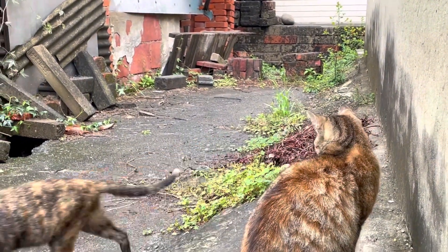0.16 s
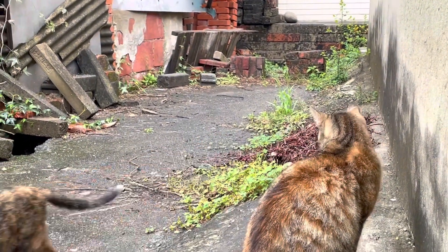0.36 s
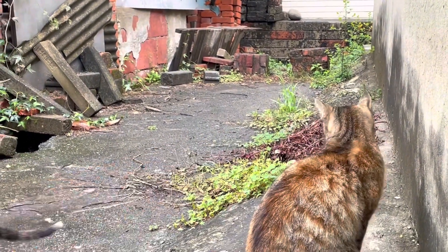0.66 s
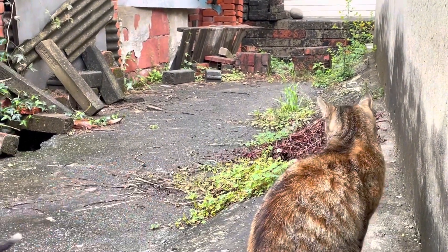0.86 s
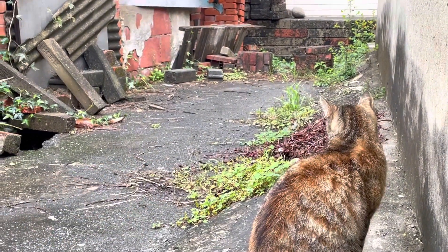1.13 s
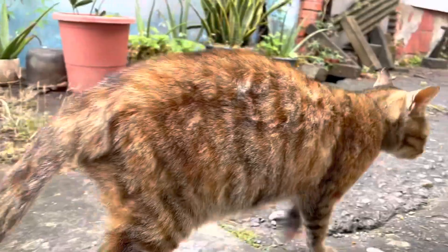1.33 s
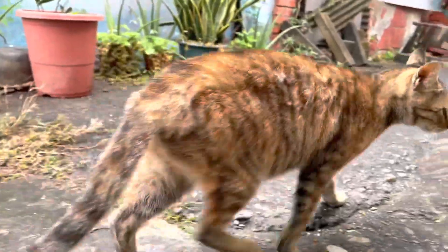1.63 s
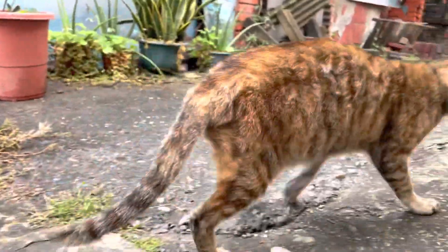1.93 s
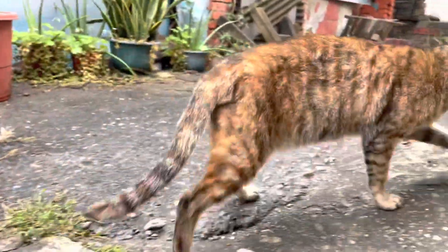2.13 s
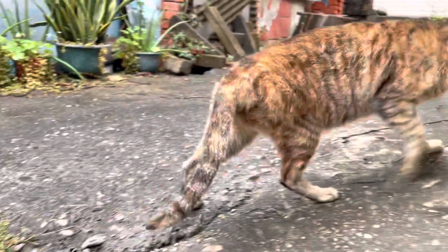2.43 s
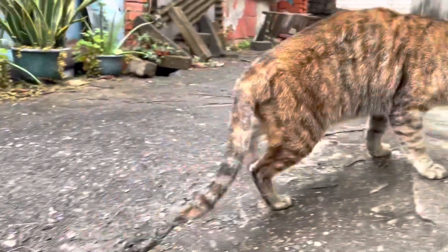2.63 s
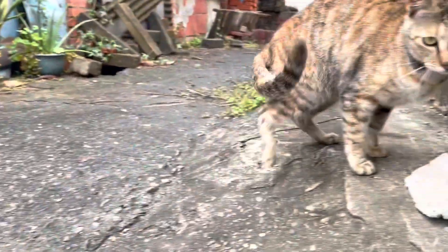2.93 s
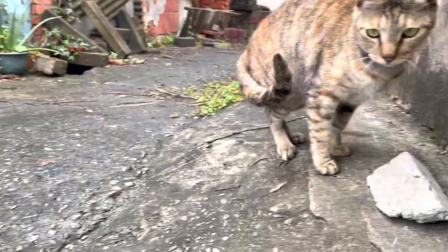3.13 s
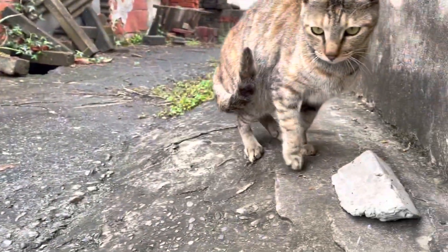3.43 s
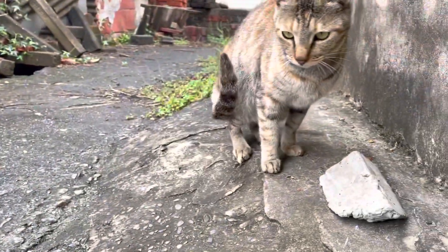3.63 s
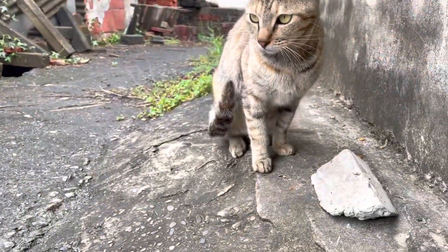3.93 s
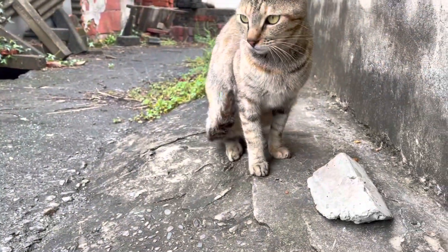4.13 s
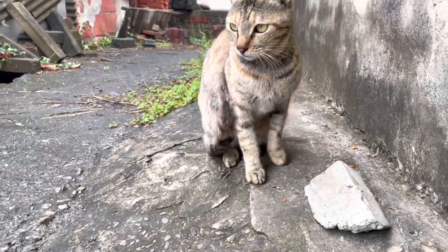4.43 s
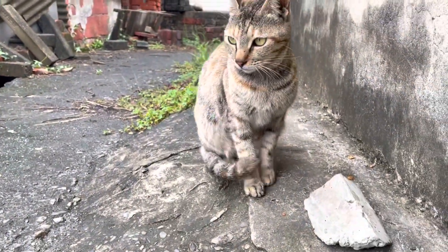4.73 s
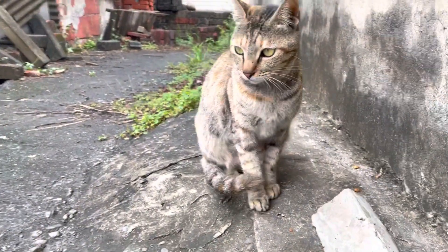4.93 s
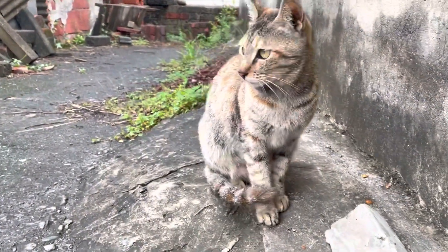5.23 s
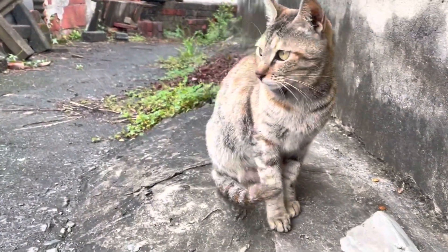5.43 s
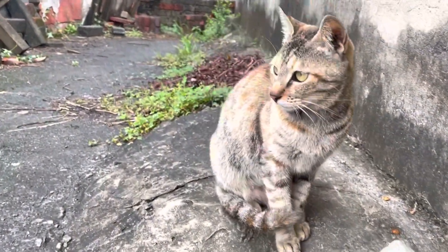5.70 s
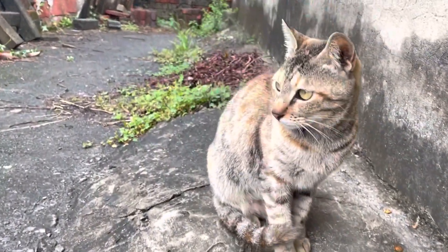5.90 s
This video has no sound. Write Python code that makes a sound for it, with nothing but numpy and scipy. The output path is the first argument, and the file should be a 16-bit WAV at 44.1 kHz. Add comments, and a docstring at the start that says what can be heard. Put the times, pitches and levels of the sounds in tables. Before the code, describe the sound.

Low distant traffic rumble in an alley with faint close scuffs and taps, two split-second dropouts, then an engine approaching with a rising whine.

```python
"""A back alley: far traffic roars over wavering hums, with two faint falling whistles early on.
Light scuffs on gritty concrete and small taps, made of short noise bursts, sound close by from the start.
At 1.2 s and again at 3.3 s all goes silent for a moment; after the first silence the traffic is brighter and wider.
After the second a vehicle draws near beyond the wall: engine tones, a rising whine and noise for the tyre roar."""
import sys
import numpy as np
from scipy import signal
from scipy.fft import rfft, irfft, next_fast_len
from scipy.io import wavfile
from scipy.ndimage import uniform_filter1d

SR = 44100
rng = np.random.default_rng(int(sys.argv[2]) if len(sys.argv) > 2 else 0)


def log_audio(samples):
    """Write samples as a 16-bit WAV file to the path given in sys.argv[1]."""
    # one column per channel
    frames = np.atleast_2d(samples).T
    # limit to full scale, then quantise
    limited = np.clip(frames, -1, 1)
    pcm = np.round(limited * 32767).astype(np.int16)
    wavfile.write(sys.argv[1], SR, pcm)


N = 267246  # length in samples, about 6.06 s

# short silences: start_s, end_s, wave height where the sound stops, wave height where it resumes
SILENCES = [(1.19324, 1.24110, .005, .017), (3.34410, 3.36658, .028, .030)]
# how often the engine fires, before a slight wander: time_s, rate_hz
FIRING_RATE = [(3.4, 45.62), (4.3, 45.78), (4.58, 47.54), (5.301, 48.06), (5.45, 48.43), (5.7, 48.3),
               (5.76, 47.92), (5.94, 48.1), (6.06, 47.6)]


def gain_of(db):
    """Turns decibels into a factor for the wave height."""
    return 10 ** (np.asarray(db) / 20)


def evened(x):
    """Scales a sound to an rms (average strength) of 1."""
    return x / np.sqrt(np.mean(x ** 2) + 1e-20)


def read(points, hz):
    """Looks up a table by frequency, with straight lines on a log-frequency axis."""
    f, value = np.transpose(points)
    return np.interp(np.log(hz + 1), np.log(f + 1), value)


def wander(per_s, count):
    """Slow random curves of rms 1: sums of 16 slow sines, the fastest at per_s cycles a second."""
    coarse_t = np.arange(0, N + 64, 64) / SR
    t = np.arange(N) / SR
    hz = np.geomspace(per_s / 20, per_s, 16)[:, None]
    curves = []
    for phase in rng.random((count, 16)):
        sines = np.sin(2 * np.pi * (hz * coarse_t + phase[:, None])) / hz ** 0.16
        curves.append(np.interp(t, coarse_t, evened(sines.sum(0))))
    return np.array(curves)


def resonate(x, hz, width):
    """A resonance, fixed or gliding: shifts hz down to zero, smooths twice, and shifts back."""
    turn = np.exp(2j * np.pi * np.cumsum(hz * np.ones(len(x))) / SR)
    r = np.exp(-np.pi * width / SR)
    smooth = signal.lfilter([(1 - r) ** 2], [1, -2 * r, r * r], x / turn)
    return 2 * (turn * smooth).real


def wash(spectrum, side_spectrum, side_db, patchy_db, flicker_db, drone_db=0):
    """Stereo noise shaped by mid and side spectra, with drifting patches and flicker in the treble."""
    # how far the side copies the mid, which tips the balance: pitch_hz, likeness (-1 to 1)
    lean = [(60, 0.34), (200, -0.57), (380, 0.096), (700, 0.35), (1300, .1), (4400, .3), (9000, 0.26)]
    # the same a quarter cycle apart, which tips the arrival: pitch_hz, likeness (-1 to 1)
    lead = [(200, 0), (380, .3), (600, .1), (1300, .3), (2200, 0.28), (3000, .4), (5000, .2), (5900, -.3),
            (9000, 0)]
    frames, hz = N // 512 + 5, np.fft.rfftfreq(2048, 1 / SR)
    a, b, c, d, patches = rng.standard_normal((frames, 1025, 5)).T
    patches = evened(uniform_filter1d(uniform_filter1d(patches, 16, 0), 8, 1))
    patches = patches * (hz / (hz + 250))[:, None]  # weaker in the bass
    flicker = evened(uniform_filter1d(rng.standard_normal(frames), 2)) * (hz / (hz + 2000))[:, None]
    drone_band = np.exp(-np.log((hz + 1) / 207) ** 2 / 4.1)[:, None]  # broad, centred near 207 Hz

    like = (read(lean, hz) + 1j * read(lead, hz))[:, None]
    mid = a + 1j * b
    side = like * mid + np.sqrt(np.clip(1 - abs(like) ** 2, 0, 1)) * (c + 1j * d)

    colour_db = np.array([read(spectrum, hz), read(side_spectrum, hz) + side_db])[:, :, None]
    level_db = colour_db + patchy_db * patches + flicker_db * flicker + drone_band * drone_db
    z = np.array([mid, side]) * gain_of(level_db)
    mid, side = signal.istft(z, nperseg=2048, noverlap=1536)[1][:, :N]
    return np.array([mid + side, mid - side]) / np.sqrt(np.mean(mid ** 2))


def traffic():
    """Far roar as shaped noise; from the end of the first silence it is brighter and wider."""
    # shape of the middle (mid) noise before the first silence: pitch_hz, relative level_db
    mid_first = [(12, -65), (20, -31), (42, -6.5), (74, -15), (106, -3.5), (145, -21), (186, -18.5),
                 (253, -28), (466, -38), (567, -41), (708, -41), (1460, -53.5), (2160, -60.5),
                 (3190, -68.5), (4300, -74.5), (15600, -86)]
    # shape of the left-right difference (side) noise then: pitch_hz, relative level_db
    side_first = [(18, -49.5), (30, -15), (103, -10.5), (169, -22), (203, -15.5), (285, -36), (411, -26),
                  (577, -30.5), (731, -30), (1370, -43), (2140, -74.5), (3160, -65.5), (15600, -70)]
    # the mid noise afterwards: pitch_hz, relative level_db
    mid_later = [(12, -65), (20, -39), (42, -9.5), (74, -9), (104, -3), (130, -7), (157, -14), (186, -19),
                 (208, -22.5), (290, -26.5), (325, -30), (599, -38.5), (1170, -45), (2400, -54.5),
                 (3300, -58.5), (5200, -68), (8700, -76), (12200, -74), (15600, -76)]
    # the side noise afterwards: pitch_hz, relative level_db
    side_later = [(18, -48.5), (30, -15), (183, -2.5), (219, -11.5), (292, -5.5), (411, -18), (456, -8.5),
                  (563, -12.5), (811, -14.5), (4220, -44.5), (8780, -47.5), (12000, -48.5), (15600, -74)]
    # boost of the far tyre hiss above about 3 kHz: time_s, boost_db
    hiss_boost = [(1.25, 2.5), (1.5, 2.5), (2.2, 1), (2.6, 4), (3.0, 4), (3.7, 1), (4.4, 2)]
    frame_s = np.arange(N // 512 + 5) * 512 / SR
    drone_db = 2 * np.exp(-((frame_s - 4.23) / 1.4) ** 2)  # far lorries: one slow swell, peak at 4.23 s
    first = wash(mid_first, side_first, -14.0, patchy_db=1.6, flicker_db=1.2, drone_db=drone_db)
    later = wash(mid_later, side_later, -23.5, patchy_db=1.3, flicker_db=1.2, drone_db=drone_db)
    first, later = gain_of(-36) * first, gain_of(-37) * later

    t = np.arange(N) / SR
    hiss = signal.sosfilt(signal.butter(2, 3000, "high", fs=SR, output="sos"), later)
    later = later + (gain_of(np.interp(t, *np.transpose(hiss_boost))) - 1) * hiss
    return np.where(t < SILENCES[0][1], first, later)


def hums():
    """Wavering tones: noise through narrow resonances, with soft ends."""
    # lasting tones: start_s, end_s, pitch_hz, width_hz, level_db, steadiness (0 to 0.5, capped there)
    tones = [(0, 6.06, 57.5, 3.05, -40, 0.55), (-0.5, 6.06, 103, 7.1, -40.5, 0.36),
             (0, 4.7, 113, 3.7, -42.5, 0.094), (0, 3.8, 120, 11, -47, 0.11),
             (4, 6.06, 123.4, 17.6, -47.5, .15), (-1.5, 1.06, 160, 8.7, -53.5, 0.14),
             (2, 5.2, 178, 9.3, -50, 0.11), (2.5, 5, 229, 9, -58, .15), (3, 3.6, 290, 16, -57.5, 0.12),
             (0, 1.5, 461, 5.2, -67.5, 0.5), (1.8, 3.11, 682, 130, -65.5, .05),
             (-0.5, 0.44, 1417, 13, -79, 0.25), (2.5, 5.1, 2020, 430, -74.5, .05),
             (3.76, 4.75, 6080, 410, -82, .05), (4.03, 5, 6100, 400, -89, .05),
             (1.5, 1.8, 1930, 250, -77, .05)]
    t, out = np.arange(N) / SR, np.zeros(N)
    for start, end, hz, width, db, steady in tones:
        tone = resonate(rng.standard_normal(N + SR), hz, width)[SR:]  # drop the build-up
        power = uniform_filter1d(tone ** 2, SR // 8)
        tone = tone / power ** np.clip(steady, 0, .5)  # evens out the slow beating
        fade = np.clip(np.minimum(t - start, end - t) / .08 + .5, 0, 1)
        out += gain_of(db) * evened(tone) * fade
    return out


def whistles():
    """Noise through a narrow resonance that slides down and flickers."""
    # faint falling whistles: start_s, end_s, start_pitch_hz, end_pitch_hz, level_db before the flicker
    slides = [(0, .15, 3550, 3400, -90), (.7, 1.25, 3310, 3070, -88.5)]
    t, out = np.arange(N) / SR, np.zeros(N)
    for start, end, start_hz, end_hz, db in slides:
        hz = np.interp(t, (start, end), (start_hz, end_hz))
        tone = evened(resonate(rng.standard_normal(N), hz, width=120))
        flicker_db = 2.2 * wander(50, count=1)[0]
        fade = np.clip(np.minimum(t - start, end - t) / .06 + .5, 0, 1)
        out += gain_of(db + flicker_db) * tone * fade
    return out


def scuffs():
    """Scuffs on grit: bursts of noise of uneven strength, with a short rise and a dying end."""
    # start_s, level_db before rise and decay, decay time_ms, treble tilt_db per octave
    scrapes = [(0.225, -75.5, 22, -8), (1.11, -75, 27, -5.5), (1.145, -62, 6.3, 13),
               (1.412, -63.5, 22, -3.5), (1.435, -59.5, 46, -9.5), (1.824, -74, 8, -8),
               (1.875, -69.5, 55, -6.5), (1.882, -69, 3.7, -5), (1.895, -63, 4.4, -7), (1.941, -71, 10, 7),
               (2.011, -75, 8, -9), (2.04, -72, 5, 5), (2.128, -72, 5, 5), (2.14, -71, 5, 5),
               (2.332, -59.5, 21, -6), (2.351, -76, 6, 0), (2.394, -67.5, 18, 5), (2.555, -61.5, 20, 5),
               (2.584, -68, 44, -5), (2.705, -67, 24, -6), (2.748, -70, 20, -2.5), (3.071, -68, 4, 2),
               (3.194, -66.5, 22, -9.5), (3.402, -60, 4, -4.5), (3.412, -55.5, 5.4, -3),
               (3.419, -67, 8, -7), (3.647, -69, 25, -4), (4.004, -71, 5, 4.5), (4.026, -69, 5, 8),
               (4.245, -71, 5.5, 3), (4.61, -70, 40, 3), (4.86, -56, 79, -6), (5.15, -60.5, 120, -4)]
    size = 8192
    out = np.zeros((2, N + size))
    t, hz = np.arange(size) / SR, np.fft.rfftfreq(size, 1 / SR)
    for s, db, decay_ms, tilt in scrapes:
        uneven_db = 2.8 * evened(uniform_filter1d(rng.standard_normal(size), 40))
        mid, side = rng.standard_normal((2, size)) * gain_of(uneven_db)
        colour = gain_of(tilt * np.log2((hz + 1) / 6000)) * hz ** 2 / (hz ** 2 + 1300.0 ** 2)
        colour = colour + gain_of(-4) * np.exp(-((hz - 4740) / 450) ** 2)  # ring of the grit at 4740 Hz
        mid = irfft(rfft(mid) * colour)
        side = 0.59 * irfft(rfft(side) * colour / (1 + (hz / 12500) ** 16))
        span = 1000 * t / decay_ms
        envelope = np.minimum(span / .3, 1) * np.exp(-span)  # the rise lasts 0.3 of the decay time
        burst = evened(np.array([mid + side, mid - side])) * envelope
        out[:, round(s * SR):][:, :size] += gain_of(db) * burst
    return out[:, :N]


def taps():
    """Small taps: each a short puff of noise through one resonance."""
    # start_s, level_db before the puff shape, ring pitch_hz, ring width_hz
    puffs = [(1.44, -63, 1300, 1300), (1.9, -64, 800, 600), (2.398, -60, 1700, 900),
             (2.556, -47, 1500, 1400), (2.747, -55, 1600, 1100), (3.41, -62, 5350, 350)]
    peak_s = .0045  # time to the top of the puff
    out, t = np.zeros((2, N)), np.arange(4096) / SR
    envelope = t / peak_s * np.exp(-t / peak_s)
    for s, db, hz, width in puffs:
        mid, side = (evened(resonate(x, hz, width)) for x in rng.standard_normal((2, 4096)))
        puff = envelope * np.array([mid + .6 * side, mid - .45 * side])
        out[:, round(s * SR):][:, :4096] += gain_of(db) * puff
    return out


def firing():
    """Running count of engine firings: the firing rate, wandering slightly, added up over time."""
    hz = np.interp(np.arange(N) / SR, *np.transpose(FIRING_RATE))
    return np.cumsum(hz * (1 + 0.0025 * wander(12, count=1)[0])) / SR


def orders(table, turns, fade_db, rough, apart, lean_db):
    """Multiples of the firing rate that swell, fade and slip one by one over shifting paths."""
    out = np.zeros((2, N))
    fades, slips = wander(17.0, count=len(table)), wander(25.0, count=len(table))
    ear_phase = [[apart], [-apart]]  # left and right out of step, radians each way
    for (k, db), fade, slip, phase in zip(table, fades, slips, rng.random(len(table))):
        angle = 2 * np.pi * (k * turns + phase) + rough * slip + ear_phase
        out += gain_of(db + fade_db * fade) * np.cos(angle)
    return evened(out * gain_of([[lean_db], [-lean_db]]))  # louder on the left


def vehicle(turns):
    """Engine boom and exhaust note as multiples of the firing rate, and tyre and exhaust roar as noise."""
    # level of the roar as the vehicle draws near: time_s, level_db
    nearing = [(3.4, -55), (3.9, -62), (4.2, -58), (4.5, -55), (4.7, -52.5), (4.9, -51.5), (5.2, -50),
               (5.5, -49.5), (5.8, -48.5), (6.06, -48.5)]
    # low engine tones: multiple of the firing rate, relative level_db
    boom = [(1, 5), (2, -2), (3, -16.5), (4, -3.5), (5, -12.5), (6, -28.5)]
    # exhaust tones: multiple of the firing rate, relative level_db
    exhaust = [(7, 1.5), (8, -8.5), (9, -6), (10, 1), (11, 1), (12, -2.5), (13, 0), (14, -2.5), (15, -9),
               (16, -7.5), (17, -9), (19, -14.5), (21, -17.5), (23, -12.5), (24, -9.5), (25, -19.5),
               (26, -8.5), (28, -18.5)]
    # shape of the roar in the middle: pitch_hz, relative level_db
    roar_mid = [(150, -9), (240, -7), (370, -26), (500, -22.5), (750, -15), (950, -25.5), (1950, -23),
                (2600, -27.5), (6900, -34), (8200, -40), (10200, -50.5), (11900, -39.5), (13900, -50),
                (15000, -46.5)]
    # shape of its left-right difference: pitch_hz, relative level_db
    roar_side = [(150, -21), (400, -14.5), (550, -5), (900, -25.5), (1200, -16.5), (1900, -24), (2200, -33),
                 (3700, -29.5), (5200, -36.5), (5900, -30), (6600, -35), (8800, -32), (12000, -42.5),
                 (13200, -89)]
    # the loudest part of the engine tones shifts as the path round the wall changes: time_s, pitch_hz, lift_db
    wall_path = [(4.3, 564, 1.8), (4.7, 497, 6.8), (5.1, 550, 0.64), (5.45, 575, 8), (5.7, 595, 1.1),
                 (5.85, 511.7, 5.02), (6.06, 484, 5.6)]
    # brief swell of the second multiple in the boom: peak_s, half_length_s, lift_db
    swell_s, swell_span_s, swell_db = (5.26, 0.38, 12.4)
    t = np.arange(N) / SR
    roar_db, closest_db = np.interp(t, *np.transpose(nearing)), nearing[-1][1]
    below_db = roar_db - closest_db
    boom_db = closest_db + 13.1 + below_db
    note_db = closest_db + 0.56 + 1.78 * below_db  # changes faster than the roar

    engine = gain_of(boom_db) * orders(boom, turns, fade_db=3.0, rough=0.35, apart=.04, lean_db=0.1)
    swell = gain_of(swell_db * np.exp(-((t - swell_s) / swell_span_s) ** 2)) - 1
    engine += swell * resonate(engine.mean(0), 2 * FIRING_RATE[-1][1], width=20)
    engine += gain_of(note_db) * orders(exhaust, turns, fade_db=3.8, rough=0.55, apart=0.79, lean_db=1.5)
    s, hz, lift_db = np.transpose(wall_path)
    hz, lift = np.interp(t, s, hz), gain_of(np.interp(t, s, lift_db, left=0)) - 1
    engine += lift * np.array([resonate(x, hz, width=175) for x in engine])

    roar = gain_of(roar_db) * wash(roar_mid, roar_side, -1.2, patchy_db=2.0, flicker_db=0.7)
    treble = signal.sosfilt(signal.butter(1, 3480, "high", fs=SR, output="sos"), roar)
    roar += (gain_of(below_db) - 1) * treble  # far off the roar is duller
    return np.clip((t - nearing[0][0]) / .5, 0, 1) * (engine + roar)


def whine(turns):
    """A band of hiss with a thin rough core, the core throbbing with the firings; both glide up."""
    # the glide before a slight wander, and the level before a brief swell: time_s, pitch_hz, level_db
    glide = [(4.6, 1650, -70), (4.8, 1760, -66), (5.05, 1775, -68), (5.17, 1790, -65.5), (5.33, 1835, -65),
             (5.5, 1870, -64.5), (5.65, 1885, -60.5), (5.8, 1940, -60), (6.06, 1930, -63)]
    t = np.arange(N) / SR
    s, hz, db = np.transpose(glide)
    hz = np.interp(t, s, hz) + 8 * wander(7.2, count=1)[0]
    db = np.interp(t, s, db) + 4 * np.exp(-((t - 5.76) / 0.1) ** 2)  # swells briefly at 5.76 s
    hiss = np.array([evened(resonate(rng.standard_normal(N), hz, width=150)) for _ in range(2)])
    core = gain_of(1.0) * np.cos(2 * np.pi * np.cumsum(hz) / SR + 2.3 * wander(30, count=2))
    throb = 1 + 0.55 * np.cos(2 * np.pi * turns)
    fade_in = np.clip((t - s[0]) / .3 + 1, 0, 1)
    return fade_in * gain_of(db) * (hiss + throb * core)


def scene():
    """All sounds of the alley added together; the boom, note and whine share one engine."""
    turns = firing()
    return traffic() + hums() + whistles() + scuffs() + taps() + vehicle(turns) + whine(turns)


def record(dry):
    """Microphone colour and bass roll-off, hard silences, then a limit on the highest pitches."""
    # colour of the sum of the two microphone ports, which cancel in a dip near 8.5 kHz: pitch_hz, level_db
    port_colour = [(7400, -1.5), (8100, -3.5), (8500, -18.5), (9500, -7.5), (10100, 2), (12000, 2.5),
                   (13800, 4.5), (14800, -12)]
    mid, side = dry.mean(0), (dry[0] - dry[1]) / 2
    size = next_fast_len(N, True)
    colour = gain_of(read(port_colour, np.fft.rfftfreq(size, 1 / SR)))
    mid = irfft(rfft(mid, size) * colour, size)[:N]
    bass_cut = signal.butter(4, 34, "high", fs=SR, output="sos")
    out = signal.sosfilt(bass_cut, [mid + side, mid - side])

    t = np.arange(N) / SR
    out = out * np.minimum(t / .004, 1)  # soft start
    for start, end, before, after in SILENCES:
        # pull the wave to a set height at each edge: that height is the step one hears
        for s, height in ((start, before), (end, after)):
            out = out + (height - out[:, [round(s * SR)]]) * np.exp(-((t - s) / .0015) ** 2)
        out = out * ((t <= start) | (t >= end))
    treble_limit = signal.firwin(511, 15750, window=("kaiser", 9), fs=SR)
    return signal.oaconvolve(out, treble_limit[None], "same")


dry = scene()
out = record(dry)
log_audio(out)
```